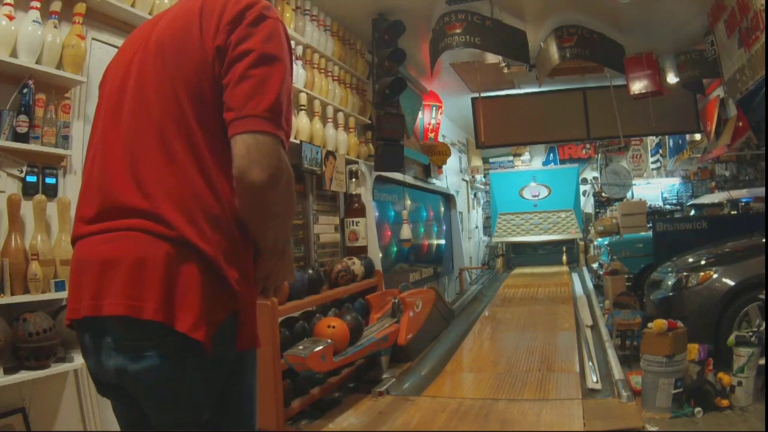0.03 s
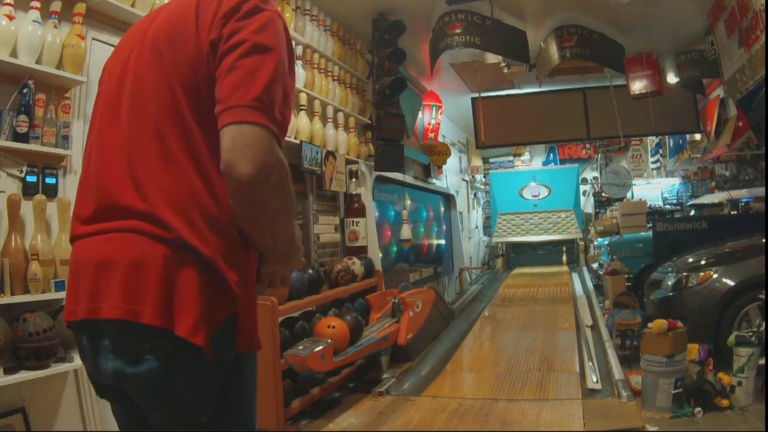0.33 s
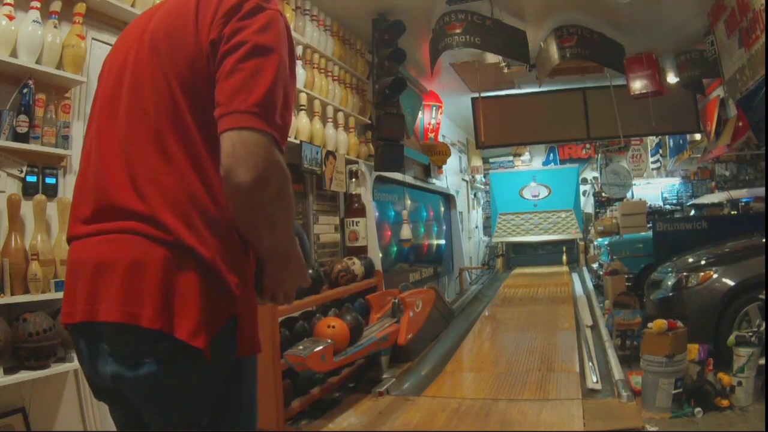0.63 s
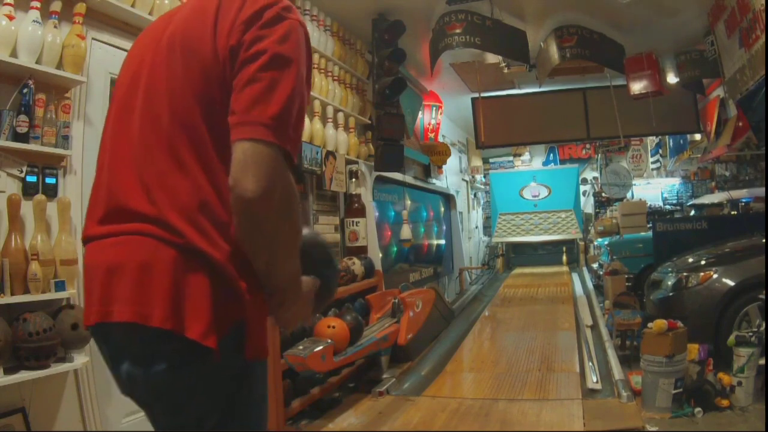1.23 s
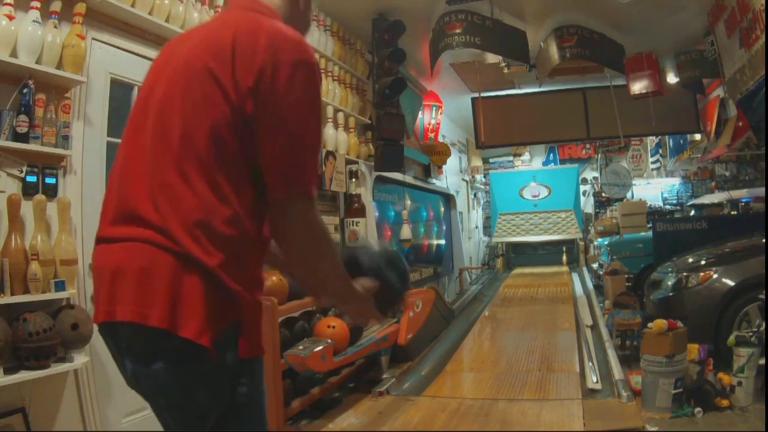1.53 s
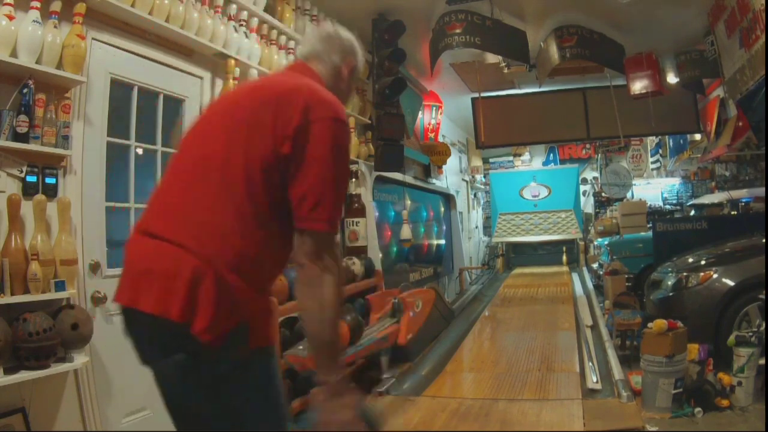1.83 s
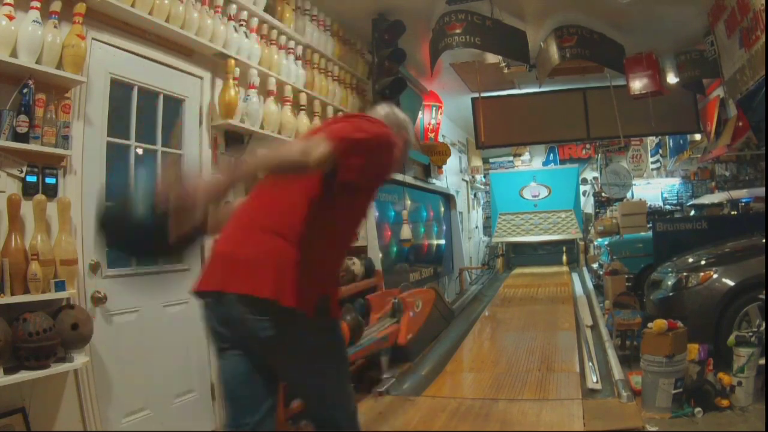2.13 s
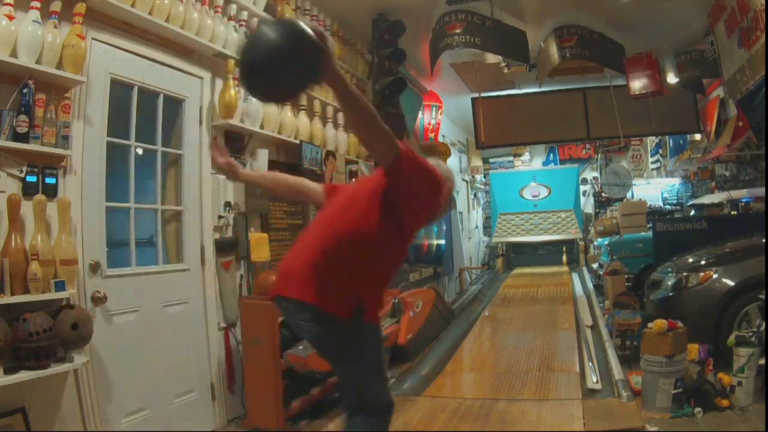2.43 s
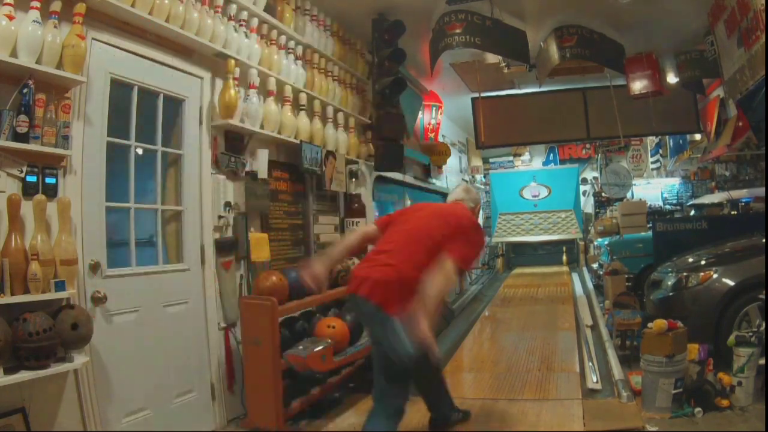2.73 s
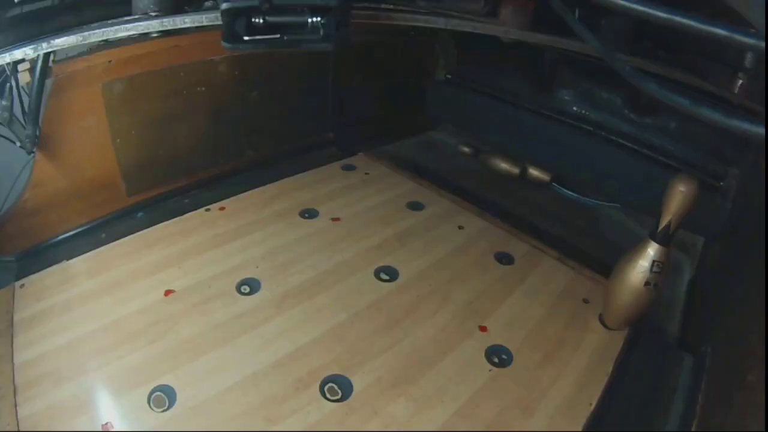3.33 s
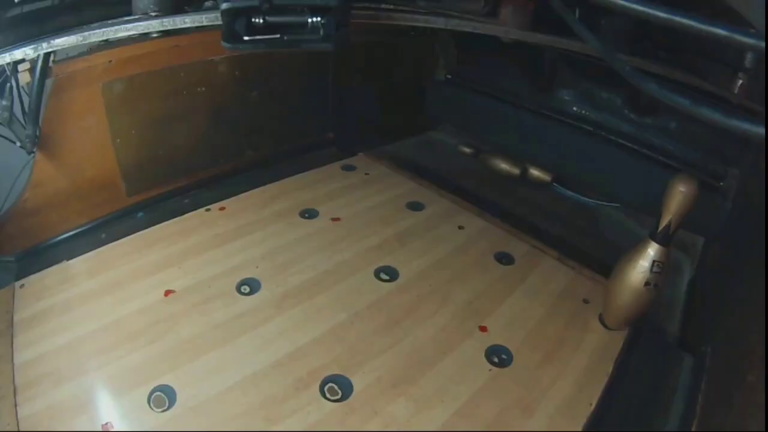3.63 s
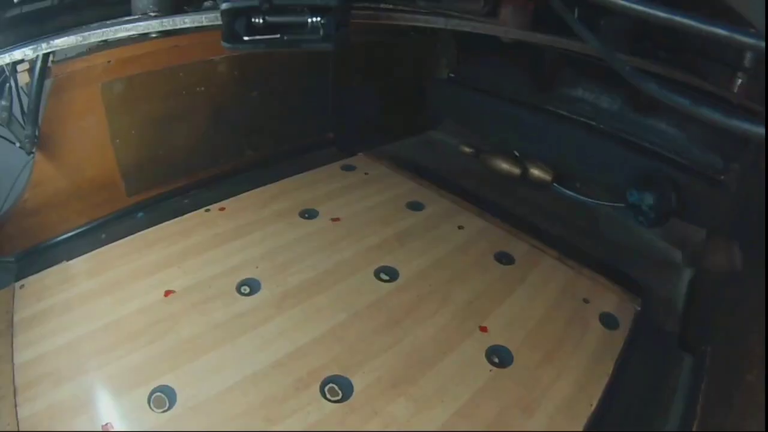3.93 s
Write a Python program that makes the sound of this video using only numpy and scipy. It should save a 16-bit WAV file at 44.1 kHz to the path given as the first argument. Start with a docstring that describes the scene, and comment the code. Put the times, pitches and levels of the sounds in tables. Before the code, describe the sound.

A bowling ball is thrown in a garage. First a fan hums faintly, with soft steps and shirt rustle. At about 2.8 seconds a thumb pops out of the ball. At 3 seconds the ball booms onto the wooden lane, bounces and rolls. From 3.6 seconds to the end at 4 it clatters loudly into a pin and the pit boards. The blows echo and distort the microphone.

```python
"""Bowling in a garage

Over a fan's hum a bowler steps up, shirt rustling. His thumb pops out of the ball, and the
hole's air resonance rises as it opens. The lofted ball booms on the wooden lane, bounces and
rolls, then clatters into the pin and the pit, each impact exciting damped vibrations.
The blows and their echoes overload a small microphone, which clips them hard."""
import sys
import numpy as np
from scipy import signal
from scipy.fft import rfft, irfft
from scipy.io import wavfile
from scipy.ndimage import uniform_filter1d

SR = 44100
rng = np.random.default_rng(int(sys.argv[2]) if len(sys.argv) > 2 else 0)


def int16_out(signal):
    """Quantize to a 16-bit WAV file."""
    q = np.round(np.clip(np.atleast_2d(signal).T, -1, 1) * 32767)
    wavfile.write(sys.argv[1], SR, q.astype(np.int16))


N = 176400
T = np.arange(N) / SR
RING_T = T[:SR]  # one second for a struck body to ring

# Spectrum of a sharp blow on lane or pin: f/Hz, relative level/dB
CRACK_SPECTRUM = [(30, -50), (150, -30), (400, 5), (900, 3.5), (1800, -2.5), (3500, -1.5), (7000, -6),
                  (10000, -11), (15500, -16)]


def amp(db):
    """Amplitude ratio of a level in decibels."""
    return 10 ** (np.asarray(db) / 20)


def unit(x):
    """Normalisation to rms 1."""
    return x / np.sqrt(np.mean(x ** 2) + 1e-20)


def read(points, hz):
    """Interpolation of a table on a logarithmic frequency axis."""
    f, value = np.transpose(points)
    return np.interp(np.log(hz + 1), np.log(f + 1), value)


def envelope(points):
    """Amplitude envelope through rows of t/s, level/dB."""
    return amp(np.interp(T, *np.transpose(points)))


def add(mix, s, sound):
    """Superposition: a sound joins the mix at time s."""
    part = mix[max(round(s * SR), 0):][:len(sound)]
    part += sound[:len(part)]


def colour(x, spectrum):
    """Zero-phase filtering by rows of f/Hz, gain/dB."""
    hz = np.fft.rfftfreq(len(x), 1 / SR)
    return irfft(rfft(x) * amp(read(spectrum, hz)), len(x))


def noise(spectrum, size=N):
    """Gaussian noise of rms 1 with a given spectral shape."""
    return unit(colour(rng.standard_normal(size), spectrum))


def band(hz, width_hz, size=N):
    """Response of a single resonator to white noise, at rms 1."""
    f = np.fft.rfftfreq(size, 1 / SR)
    detune = (f ** 2 - hz ** 2) / (width_hz * (f + 1))
    return unit(irfft(rfft(rng.standard_normal(size)) / (1 + 1j * detune), size))


def decay(t, t60):
    """Exponential damping: 60 dB down after t60 seconds."""
    return np.exp(-np.log(1000) * t / np.maximum(t60, 1e-3))


def ring(modes):
    """Free vibration as a sum of damped modes, from rows of f/Hz, level/dB, T60/s."""
    return sum(amp(db) * decay(RING_T, t60) * np.sin(2 * np.pi * hz * RING_T) for hz, db, t60 in modes)


def burst(spectrum, t60):
    """Modal overlap: a struck body with densely packed modes sounds as decaying noise."""
    return noise(spectrum, size=SR) * decay(RING_T, t60)


def echo(spectrum, build_s=0.0083):
    """Diffuse field: a blow scattered by the garage builds up, then each band dies at its own rate."""
    # Reverberation time of the garage: f/Hz, T60/s
    reverb_times = [(100, 0.3), (500, 0.4), (1500, 0.84), (4000, 0.6), (8000, 0.5), (15000, 0.37)]
    hz, t, bands = signal.stft(noise(spectrum, size=SR), SR, nperseg=256)
    damped = bands * decay(t, read(reverb_times, hz)[:, None])
    tail = signal.istft(damped, SR, nperseg=256)[1][:SR]
    return tail * (1 - np.exp(-RING_T / build_s))


def in_room(x, wet_db):
    """Reverberation: direct sound plus its convolution with the room's impulse response."""
    tail = echo([(0, 0), (SR, 0)])  # flat excitation
    return x + amp(wet_db) * signal.fftconvolve(x, tail / np.linalg.norm(tail))[:len(x)]


def walls(x, reflect_db=-20, count=8):
    """Early reflections: the near walls and ceiling return weak, delayed copies."""
    out = x.copy()
    for delay_s, sign in zip(rng.uniform(.004, .028, count), rng.choice([-1, 1], count)):
        add(out, delay_s, sign * amp(reflect_db) * x)
    return out / np.sqrt(1 + count * amp(reflect_db) ** 2)


def hum():
    """Noise-driven resonance: a fan's broad whirr and thin whine stand above steady air noise."""
    # Air noise of the room: f/Hz, relative level/dB
    air_spectrum = [(15, -22), (60, -15), (95, -29), (122, -13.5), (165, -23), (290, -20), (360, -17),
                    (709, -12.5), (1080, -11), (1500, -10), (2300, -15), (3200, -18.5), (4500, -15),
                    (5400, -16.5), (6050, -13.5), (7200, -19.5), (11500, -23), (15500, -33)]
    # Level of the whirr over time, dropping after 1.95 s: t/s, level/dB
    whirr_levels = [(0, -42), (.25, -43), (.5, -46), (1.1, -46.5), (1.28, -50), (1.36, -43), (1.7, -44),
                    (2.05, -54), (2.45, -49), (4, -66)]
    whirr = envelope(whirr_levels) * band(1068, width_hz=195)
    air = amp(-46) * noise(air_spectrum)
    whine = amp(-52.5) * band(1093.5, width_hz=7.4)
    return air + whirr + whine


def shirt(grain_db=2):
    """Friction noise: cloth slides in grainy swells as the bowler moves."""
    # Gaussian swells: centre t/s, standard deviation/s, level/dB
    rustles = [(.1, 0.097, -48), (0.602, 0.04, -46.5), (1.022, 0.065, -44), (1.484, 0.12, -44.5),
               (1.8, 0.046, -53.5), (2.148, 0.2, -50.5), (2.695, 0.079, -43.5)]
    # Sliding cloth: f/Hz, relative level/dB
    cloth_spectrum = [(100, -23), (700, -10), (2000, -11.5), (3200, -12.5), (4500, -3), (5900, 1),
                      (7800, -12), (11000, -8.5), (15500, -27)]
    swell = sum(amp(db) * np.exp(-.5 * ((T - s) / width) ** 2) for s, width, db in rustles)
    grain = amp(grain_db * unit(uniform_filter1d(rng.standard_normal(N), size=200)))
    return swell * unit(grain * noise(cloth_spectrum))


def footsteps(step_t60=0.4, scuff_rise_s=0.01, board_db=-2, board_t60=0.2):
    """Impact and friction: the heel thumps and sets a board ringing while the sole scuffs."""
    # Footfalls: t/s, heel level/dB, sole level/dB, board f/Hz
    steps = [(.025, -43.5, -40, 169), (.095, -40.5, -30.5, 504), (1.9507, -39, -47, 372),
             (2.547, -43.5, -45.5, 183)]
    # Spectra of heel thump and sole scuff: f/Hz, relative level/dB
    heel_spectrum = [(30, -26), (100, -12), (160, -6), (400, -3.5), (600, 0.5), (1000, -7), (3000, -16),
                     (15500, -60)]
    sole_spectrum = [(30, -35), (250, -19), (500, 4.5), (1600, 6.5), (2500, -16), (6000, -10.5),
                     (15500, -52)]
    out = np.zeros(N)
    for s, heel_db, sole_db, hz in steps:
        heel = burst(heel_spectrum, step_t60) + ring([(hz, board_db, board_t60)])
        sole = burst(sole_spectrum, step_t60) * (1 - np.exp(-RING_T / scuff_rise_s))
        add(out, s, amp(heel_db) * heel + amp(sole_db) * sole)
    return out


def thumb(snap_s=2.786, pop_s=2.788, fingers_s=2.8255):
    """Cavity resonance: the thumb squeaks free, the opening hole's note rises, the fingers tick out."""
    # Squeaky snap of the thumb: f/Hz, relative level/dB
    snap_spectrum = [(30, -50), (1500, -11.5), (4600, -16), (5300, -3), (5800, -3), (6400, -11),
                     (7300, -14), (7900, -4.5), (8600, -7), (9300, -13), (15500, -26)]
    out = np.zeros(N)
    snap = burst(snap_spectrum, t60=0.027) + amp(-20) * echo(snap_spectrum)
    add(out, snap_s, amp(-12.5) * snap)

    start_hz, open_hz, glide_s = 473, 1078, 0.00963
    hz = np.interp(RING_T, [0, glide_s], [start_hz, open_hz])
    since_open = np.maximum(RING_T - glide_s, 0)
    pop = np.sin(2 * np.pi * np.cumsum(hz) / SR) * decay(since_open, t60=0.028)
    add(out, pop_s, amp(-17) * in_room(pop, wet_db=-13))
    last_note = band(open_hz, width_hz=220, size=SR) * decay(RING_T, t60=0.42)  # hangs in the room
    add(out, pop_s + glide_s, amp(-38) * last_note)

    finger_tick = band(2400, width_hz=2000, size=SR) * decay(RING_T, t60=.012)
    add(out, fingers_s, amp(-27) * finger_tick)
    return out


def ball(lumpy_db=1.5):
    """Impact and roughness excitation: the lane booms at each bounce and rumbles under the roll."""
    # Ball striking the lane: t/s, boom level/dB, crack level/dB
    bounces = [(2.968, 9.5, -6.5), (3.125, -9.5, -27.5), (3.187, -23.5, -55), (3.44, -28, -43)]
    # Course of the rolling noise: t/s, level/dB
    roll_levels = [(2.97, -61), (3.11, -53), (3.15, -27.5), (3.25, -32.5), (3.41, -39.5), (3.47, -33.5),
                   (3.54, -36), (3.62, -35), (3.67, -40), (4, -42)]
    # Spectra of the lane, struck and rolled on: f/Hz, relative level/dB
    boom_spectrum = [(30, -33), (80, -12), (150, -9), (270, -2), (400, -1), (650, -5), (1000, -12.5),
                     (2000, -16.5), (15500, -68)]
    rumble_spectrum = [(30, -48), (80, -11), (170, 0.5), (450, 1.5), (1000, -3.5), (2200, -13.5),
                       (5000, -13), (15500, -29)]
    wood_grain = amp(lumpy_db * unit(uniform_filter1d(rng.standard_normal(N), size=700)))
    landed = T > bounces[0][0]
    out = envelope(roll_levels) * unit(wood_grain * noise(rumble_spectrum)) * landed
    for s, boom_db, crack_db in bounces:
        boom = burst(boom_spectrum, t60=.22)
        add(out, s, amp(boom_db) * boom + amp(crack_db) * echo(CRACK_SPECTRUM))
    return out


def pin_deck(clack_t60=0.46, ring_t60=0.043, knock_t60=0.14):
    """Damped vibration after impact: hard clacks, and the ball's heavy knocks on deck and pit boards."""
    # Clacks at the deck: t/s, noise level/dB, ring f/Hz, ring level/dB
    clacks = [(3.560, -23.5, 2035, -16.5), (3.654, -26, 2380, -19.5), (3.907, -23, 7730, -8)]
    # Knocks on the boards: t/s, level/dB, f/Hz
    knocks = [(3.576, -23, 375), (3.696, -1.5, 391), (3.874, -3.5, 430.3), (3.927, -7, 508.6)]
    # Spectra of a clack and of the struck boards: f/Hz, relative level/dB
    clack_spectrum = [(30, -48), (250, 1), (800, 8), (2000, 7.5), (3000, 5), (5000, 6.5), (7500, -1),
                      (10000, -6), (15500, -16)]
    board_spectrum = [(30, -45), (150, -15), (350, 0), (600, 1), (1200, -19.5), (15500, -67)]
    out = np.zeros(N)
    for s, db, hz, ring_db in clacks:
        note = ring([(hz, ring_db, ring_t60)])
        add(out, s, amp(db) * burst(clack_spectrum, clack_t60) + note)
    for s, db, hz in knocks:
        knock = ring([(hz, 0, knock_t60)]) + amp(-3) * burst(board_spectrum, knock_t60)
        add(out, s, amp(db) * in_room(knock, wet_db=-6))
    return out


def pin(ring_db=-9, tick_db=-8):
    """Normal modes: the struck pin ticks and rings, and each crack reverberates in the garage."""
    # Blows on the pin: t/s, body level/dB, crack level/dB
    hits = [(3.7185, 3.5, -10.5), (3.79, -24, -14), (3.875, -10.5, -9), (3.925, -6.5, -8), (3.992, -6, -18)]
    # Distinct modes of the pin: f/Hz, relative level/dB, T60/s
    modes = [(607.4, 3.5, 0.23), (766.4, 1.5, 0.25), (876, -9.5, 0.25), (1002, -5, 0.48), (1107.5, -3, 0.2),
             (1281, -5, 0.23)]
    # Its dense, overlapping modes: f/Hz, relative level/dB
    body_spectrum = [(30, -32), (100, -40), (220, -6), (500, 1), (750, 1.5), (1100, 3), (1500, -18),
                     (3000, -18), (15500, -56)]
    out = np.zeros(N)
    for s, body_db, crack_db in hits:
        body = burst(body_spectrum, t60=0.31) + amp(ring_db) * ring(modes)
        tick = amp(tick_db) * burst(CRACK_SPECTRUM, t60=0.046)
        add(out, s, amp(body_db) * (body + tick) + amp(crack_db) * echo(CRACK_SPECTRUM))
    return out


def scene():
    """Superposition of all sources at one microphone, the same in both channels."""
    mono = walls(hum() + shirt() + footsteps() + ball() + pin_deck() + pin()) + thumb()
    return np.array([mono, mono])


def record(dry, clip_db=-20.5, bass_ceiling_db=-5, bass_leak_db=-18, cutoff_hz=15700):
    """Saturation: the microphone clips hard, a little bass gets past, and filters shape the result."""
    # Frequency responses of the clipped path and of the bass leak: f/Hz, relative gain/dB
    clipped_response = [(20, -20), (70, -13.5), (160, -1.5), (380, -1.5), (800, 0), (1500, -2),
                        (4000, -1.5), (8000, -1.5), (15500, -5.5)]
    bass_response = [(20, -28), (120, -19.5), (400, -2.5), (800, -9), (1500, -18), (4000, -33),
                     (20000, -60)]
    drive = signal.resample_poly(dry[0], 2, 1) / amp(clip_db)  # oversampled to reduce aliasing
    saturated = drive / (1 + drive ** 6) ** (1 / 6)
    clipped = amp(clip_db) * signal.resample_poly(saturated, 1, 2)
    bass = amp(bass_ceiling_db) * np.tanh(dry[0] / amp(bass_ceiling_db))
    toned = colour(np.pad(clipped, (0, N)), clipped_response)
    leak = amp(bass_leak_db) * colour(np.pad(bass, (0, N)), bass_response)
    band_limit = signal.firwin(1023, cutoff_hz, window=("kaiser", 9), fs=SR)
    out = signal.oaconvolve((toned + leak)[:N], band_limit, "same")
    return np.array([out, out])


dry = scene()
out = record(dry)
int16_out(out)
```